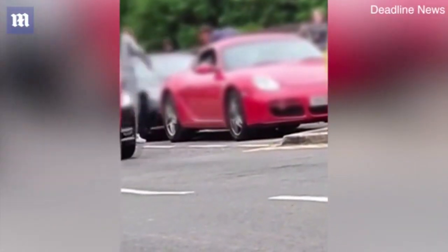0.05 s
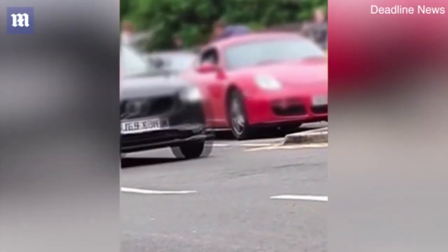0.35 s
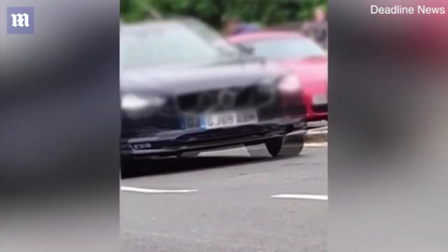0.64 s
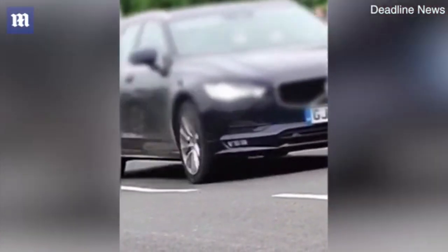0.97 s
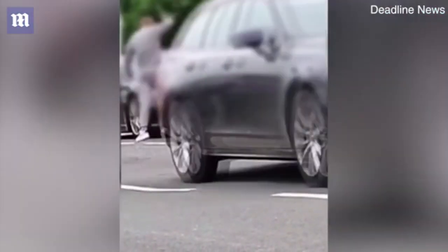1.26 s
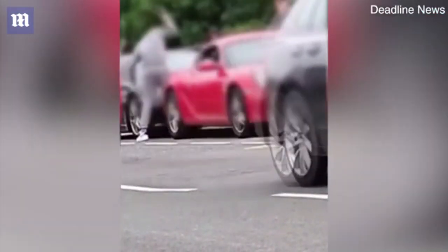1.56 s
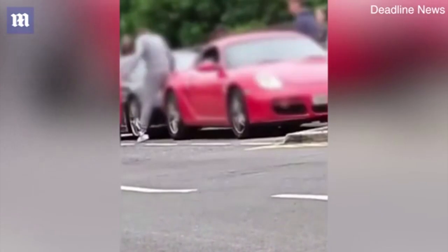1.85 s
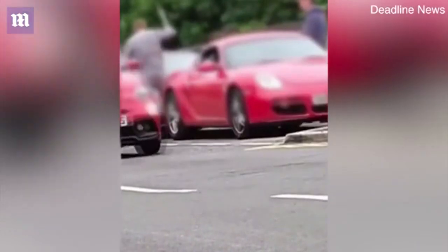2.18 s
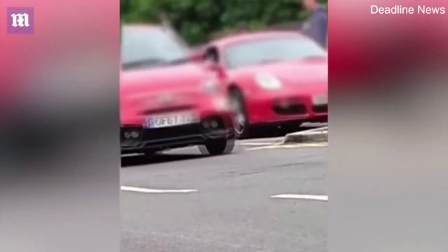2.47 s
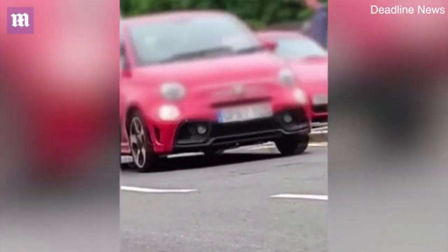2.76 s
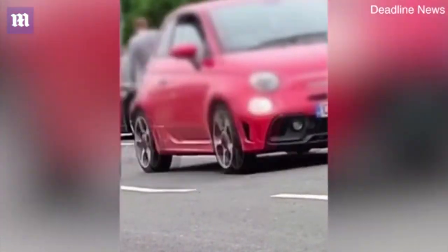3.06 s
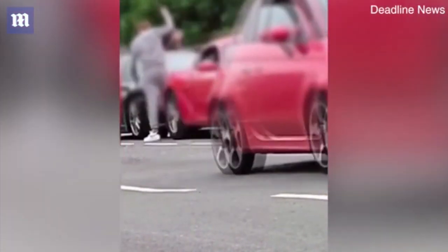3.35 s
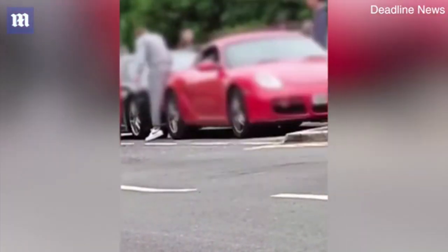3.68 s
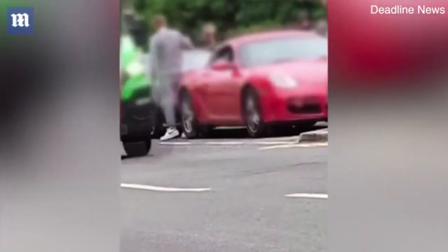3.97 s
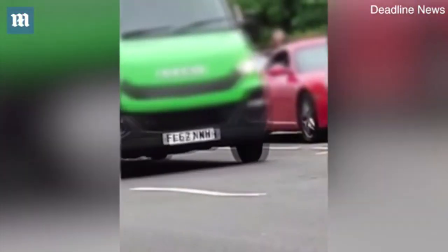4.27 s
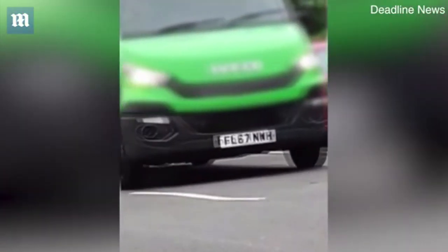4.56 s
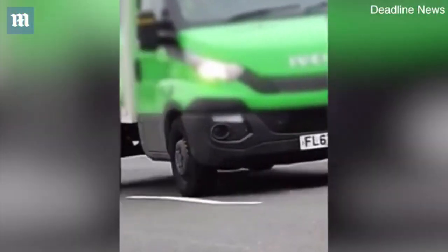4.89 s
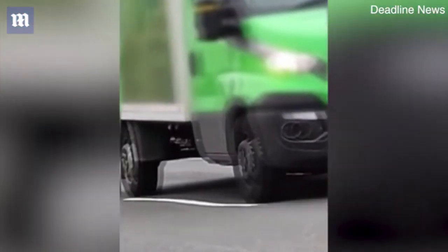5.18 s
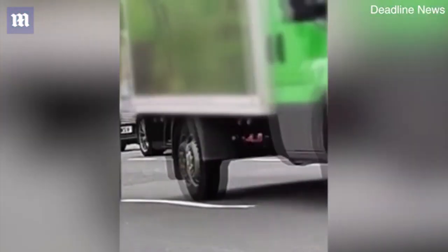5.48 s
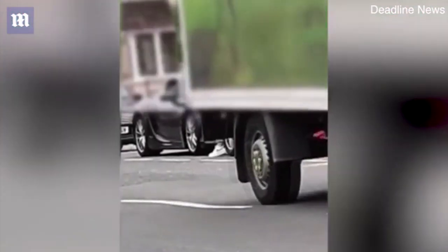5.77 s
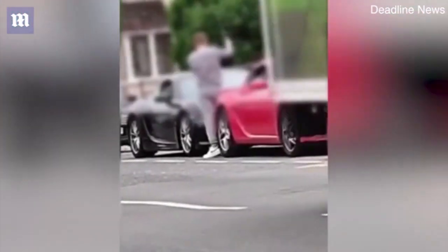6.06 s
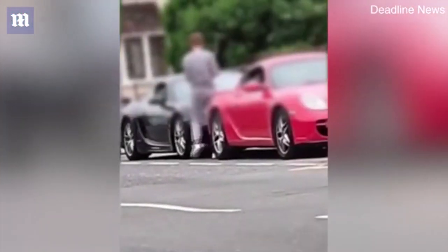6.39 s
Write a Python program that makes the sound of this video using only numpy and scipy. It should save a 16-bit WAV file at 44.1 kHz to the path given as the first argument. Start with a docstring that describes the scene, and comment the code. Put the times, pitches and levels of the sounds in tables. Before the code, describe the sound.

A steel wrench beats a car bonnet seven times, a little under a second apart. Each blow is a deep panel boom with a sheet metal crash, a brief clang, a faint rattle and a short echo. Heard from across a busy street, the blows stand above steady traffic and a low idling engine, while two cars and then a light lorry roll past.

```python
"""A steel wrench beats a car bonnet, seven blows, heard from across a busy street.
Each blow makes the panel boom; the wrench bites, bottoms out a moment later and the sheet steel crashes.
A metallic clang rings on, the loosened bonnet rattles, and the street throws back a short echo.
An engine idles nearby while two cars and a light lorry roll past, out of the steady traffic."""
import sys
import numpy as np
from scipy import signal
from scipy.fft import rfft, irfft, next_fast_len
from scipy.io import wavfile

SR = 44100
rng = np.random.default_rng(int(sys.argv[2]) if len(sys.argv) > 2 else 0)


def bounce(signal):
    """Save signal as a 16-bit WAV file at the path given by the first command-line argument."""
    frames = np.transpose(np.atleast_2d(signal))
    limited = np.clip(frames, -1, 1)
    pcm = np.round(limited * 32767).astype(np.int16)
    wavfile.write(sys.argv[1], SR, pcm)


N = 283607

# Wrench blows, the second landing twice: start_s, boom_db, off_centre (0-1), pitch_factor, bite_db,
# bottom_wait_s, bottom_db, bright_db_per_octave, ring_factor
BLOWS = [(0.2826, 1.5, 0.2, 0.95, -15.5, 0.0135, -16, -1.25, 1.15),
         (1.2132, -1.5, 0.45, 0.96, -22, 0.01, -18.5, 0.1, .9),
         (1.2308, 0.1, 1, 1.025, -17.5, 0.0153, -37, -1, 0.74),
         (2.0863, 2.5, 0.22, 1.01, -16.5, 0.015, -19, 0.6, .9),
         (3.0045, 1, 0.14, 1.04, -18, 0.013, -9.5, -0.1, 1.02),
         (3.9248, -1, 0.18, 1.01, -17, 0.0125, -10.8, 0, 0.84),
         (4.9637, -0.5, 0.1, 1.0, -27.5, 0.011, -12.5, -0.4, 1.02),
         (5.8437, 0.5, 0.04, 0.97, -24, 0.011, -16, 0.2, 0.86)]
# Where the impacts sit between the ears: frequency_hz, left_minus_right_db
IMPACT_BALANCE = [(150, -1), (400, -4), (1000, -1.5), (2000, 0), (3300, -0.5), (4800, 3), (5600, -1),
                  (6500, -13), (7200, -12), (8200, -8)]
# Stereo width of the street: frequency_hz, left_right_likeness (-1 to 1)
ROAD_LIKENESS = [(60, .95), (250, .88), (600, .84), (1200, .72), (2200, .62), (3000, .42), (4300, .33),
                 (5800, -.1), (8000, 0.05)]
# Where the street sits between the ears: frequency_hz, left_minus_right_db
ROAD_BALANCE = [(50, 0.5), (150, 0), (320, -2.5), (900, -3), (1500, 1), (2700, -0.5), (4700, 1.5),
                (5700, -1), (6700, -8), (7400, -7), (8200, -2)]


def bonnet_boom(scatter_db, detune):
    """The whole panel swings in its low modes; a blow off centre favours the higher ones."""
    # Panel modes: pitch_hz, level_db, t60_s, first_swing_sign, off_centre_change_db
    modes = [(52.7, -25.5, .15, 1, 2), (76.3, -22, .39, 1, -8), (108.5, -13, .18, -1, -6),
             (134, -28, .36, 1, 4), (173.4, -19, .17, -1, 6), (238, -25, .18, -1, 4)]
    out, t = np.zeros((2, N)), np.arange(SR) / SR
    chance = rng.standard_normal((len(BLOWS), len(modes), 2))
    for (start_s, level_db, off_centre, pitch, *_), luck in zip(BLOWS, chance):
        for (hz, mode_db, t60, direction, edge_db), (strength, shift) in zip(modes, luck):
            gain = from_db(level_db + mode_db + off_centre * edge_db + scatter_db * strength)
            swing = np.sin(2 * np.pi * hz * pitch * (1 + detune * shift) * t)
            add(out, start_s, direction * gain * swing * decay(t, t60))
    return out


def wrench_contacts():
    """Steel meets steel twice a blow: softer contacts are duller, harder ones choke the sheet's ring."""
    firm_db, firm_t60_s, longest_t60_s = -16, 0.097, 0.093
    dulling, choking = 0.97, 0.55   # per dB of force: dB per octave of tilt, dB of ring time
    contacts = []
    for start_s, _, _, _, bite_db, wait_s, bottom_db, blow_tilt_db, ring in BLOWS:
        for contact_s, level_db in ((start_s, bite_db), (start_s + wait_s, bottom_db)):
            force_db = level_db - firm_db
            tilt_db = blow_tilt_db + np.clip(dulling * force_db, -6, 0)
            t60 = min(ring * firm_t60_s * from_db(-choking * force_db), longest_t60_s)
            contacts.append((contact_s, level_db, tilt_db, t60))
    return contacts


def sheet_noise(size, tilt_db):
    """The countless close modes of sheet steel blur into a wash of noise."""
    # Colour of the sheet: frequency_hz, level_db
    colour = [(120, -11), (260, -0.5), (550, 2), (900, 1.5), (1400, 1), (2200, 0), (2800, -5.5), (3700, -8),
              (4800, -8.5), (5800, -9), (6700, -5.5), (7500, -12.5), (8150, -20), (8400, -44)]
    # Stereo width of the sheet: frequency_hz, left_right_likeness (-1 to 1)
    likeness = [(200, .95), (1000, .92), (3200, .86), (4300, .1), (5500, -.55), (6500, -.15), (7400, .3),
                (8200, .1)]
    return stereo_noise(colour, likeness, IMPACT_BALANCE, size, tilt_db)


def sheet_crash(spread_s, split_hz, low_linger):
    """Each contact spreads over the sheet and wakes its dense modes; the lower ones linger."""
    out, t = np.zeros((2, N)), np.arange(SR // 2) / SR
    lowpass = signal.butter(2, split_hz, fs=SR, output="sos")
    attack = 1 - np.exp(-t / spread_s)
    for start_s, level_db, tilt_db, t60 in wrench_contacts():
        sheet = sheet_noise(len(t), tilt_db)
        low = signal.sosfiltfilt(lowpass, sheet)
        burst = low * decay(t, t60 * low_linger) + (sheet - low) * decay(t, t60)
        add(out, start_s, from_db(level_db) * burst * attack)
    return out


def metallic_clang(level_db, scatter_db):
    """A cluster of decaying tones rings on, in a different blend at each contact."""
    # Ringing tones of the metallic clang at each contact: pitch_hz, level_db, t60_s
    tones = [(375, -35, .16), (470, -33, .16), (540, -33, .18), (740, -37, .16), (880, -31, .25),
             (1035, -32, .16), (1150, -34, .18), (1290, -32, .16), (1570, -32, .14), (1820, -31, .12),
             (2080, -33, .12), (2315, -30, .16), (2500, -41, .35), (2785, -35.5, .2), (3235, -38, .22),
             (3480, -38, .14), (3740, -38, .14), (4700, -39, .12), (6500, -39, .1), (6930, -35, .14),
             (7310, -40, .1)]
    hz, tone_db, t60 = np.transpose(tones)
    out, t = np.zeros((2, N)), np.arange(SR // 2) / SR
    contacts = wrench_contacts()
    chance = rng.standard_normal((len(contacts), 3, len(tones)))
    ears = panned(0.92, at_hz(IMPACT_BALANCE, hz))
    for (start_s, contact_db, tilt_db, _), (strength, shift, direction) in zip(contacts, chance):
        colour_db = tone_db + tilt_db * np.log2(hz / 1500) + scatter_db * strength
        gain = np.sign(direction) * from_db(level_db + contact_db + colour_db)
        detuned_hz = hz * (1 + 0.0049 * shift)
        rings = np.sin(2 * np.pi * np.outer(detuned_hz, t)) * decay(t, t60[:, None])
        add(out, start_s, (ears * gain) @ rings)
    return out


def paint_crack(level_db, t60, tilt_db):
    """Paint and skin give way in a few bright milliseconds at each contact."""
    out, t = np.zeros((2, N)), np.arange(SR // 10) / SR
    for start_s, contact_db, contact_tilt_db, _ in wrench_contacts():
        snap = sheet_noise(len(t), tilt_db + contact_tilt_db) * decay(t, t60)
        add(out, start_s, from_db(contact_db + level_db) * snap)
    return out


def bonnet_rattle(level_db, first_s, last_s, fade_db, t60, count):
    """The bonnet chatters against its catch and trim, louder as every blow loosens it."""
    loosening_db = 1.23
    out, t = np.zeros((2, N)), np.arange(SR // 4) / SR
    tick = sheet_noise(len(t), tilt_db=-1) * decay(t, t60)
    for blows_before, (start_s, *_) in enumerate(BLOWS):
        for progress in (np.arange(count) + rng.random(count)) / count:
            tick_s = start_s + first_s + progress * (last_s - first_s)
            tick_db = level_db + loosening_db * blows_before + fade_db * progress
            add(out, tick_s, from_db(tick_db) * tick)
    return out


def street_echo(sound, level_db, t60, build_s, treble_db):
    """Parked cars and house fronts scatter a short, dull tail."""
    t = np.arange(SR) / SR
    colour = [(50, 0.015), (1000, 0.03), (8000, treble_db)]   # frequency_hz, level_db
    walls = stereo_noise(colour, ROAD_LIKENESS, ROAD_BALANCE, len(t))
    tail = walls * decay(t, t60) * (1 - np.exp(-(t / build_s) ** 2))
    tail /= np.sqrt(np.mean(np.sum(tail ** 2, axis=1)))
    return from_db(level_db) * signal.fftconvolve(sound, tail, axes=1)[:, :N]


def traffic():
    """Bodies rumble, tyres roar and whoosh, and treads hiss as each vehicle comes by."""
    # Colours of body rumble, car and lorry tyre roar, tyre whoosh and tread hiss: frequency_hz, level_db
    rumble_colour = [(20, -15), (35, -8.5), (52, 8.5), (80, 0.5), (115, -1), (165, -6.5), (230, -7),
                     (340, -13.5), (550, -33)]
    car_colour = [(200, -4.5), (350, -3), (520, 0), (660, 0.5), (930, 0), (1200, -4.5), (1500, -7.5),
                  (2000, -20.5)]
    lorry_colour = [(200, -4.5), (350, 1), (530, 0.5), (700, -2.5), (950, -1), (1200, -2), (1500, -9.5),
                    (2000, -34)]
    whoosh_colour = [(1000, -15), (1400, -2.5), (1650, 0.5), (2000, -1), (2450, -3), (2850, -14),
                     (3600, -30.5)]
    hiss_colour = [(1900, -3), (2850, 2), (3500, 0.5), (4500, 2), (5600, 2), (6400, 5), (7000, 2),
                   (7700, 0), (8400, -23.5)]
    # Crossfade from the cars' roar to the lorry's: start_s, end_s
    crossfade = (3.32, 4.35)
    lorry_share = np.interp(np.arange(N) / SR, crossfade, (0, 1))
    rumble_db, roar_db, whoosh_db, hiss_db = pass_by_levels()
    rumble = road_noise(rumble_colour, rumble_db + 1.5, flutter_db=1.24, reflected=0)
    cars = road_noise(car_colour, roar_db + 0.41, flutter_db=0, reflected=0.21)
    lorry = road_noise(lorry_colour, roar_db + 1.9, flutter_db=0, reflected=0.21)
    roar = np.sqrt(1 - lorry_share) * cars + np.sqrt(lorry_share) * lorry
    whoosh = road_noise(whoosh_colour, whoosh_db - 0.45, flutter_db=-0.4, reflected=0.42)
    hiss = road_noise(hiss_colour, hiss_db + 2.5, flutter_db=1.52, reflected=0.42)
    return rumble + roar + whoosh + hiss


def pass_by_levels():
    """Four level curves in dB: each vehicle nears and leaves on a straight line, over the far street."""
    # A quiet saloon, a small car and the lorry: nearest_s, fade_s, rumble_db, roar_db, whoosh_db, hiss_db
    passes = [(0.8, 0.76, -45, -55, -63, -56), (2.86, 0.69, -44, -35, -39, -40),
              (5.64, 2.3, -37, -37.5, -43.8, -44)]
    # The steady bed of distant traffic: rumble_db, roar_db, whoosh_db, hiss_db
    far_traffic = (-41.5, -53, -57, -53)
    # Tyres throw their treble backwards, so it peaks later: rumble_s, roar_s, whoosh_s, hiss_s
    lags = (0.0059, 0, .04, 0.044)
    t = np.arange(N) / SR - np.array(lags)[:, None]
    power = from_db(far_traffic)[:, None] ** 2
    for nearest_s, fade_s, *levels_db in passes:
        distance = np.hypot(1, (t - nearest_s) / fade_s)   # in units of the closest approach
        amplitude = from_db(levels_db)[:, None] / distance ** 1.48
        power = power + amplitude ** 2
    return 10 * np.log10(power)


def road_noise(colour, level_db, flutter_db, reflected):
    """One layer of the traffic noise; flutter_db sets how much uneven asphalt shakes its level."""
    direct = stereo_noise(colour, ROAD_LIKENESS, ROAD_BALANCE, N)
    rippled = car_reflections(direct, reflected, delay_s=0.0035, sway_s=0.0006, count=3)
    return from_db(level_db + flutter_db * drift(8.8)) * rippled


def car_reflections(sound, share, delay_s, sway_s, count):
    """Paths off moving car bodies keep changing and sweep ripples through the noise."""
    samples, out = np.arange(N), sound.copy()
    for k in range(count):
        lag = SR * ((k + 1) * delay_s + sway_s * drift(0.88))
        delayed = np.array([np.interp(samples - lag, samples, ear) for ear in sound])
        out += share * (-1) ** k * delayed
    return rms_one(out)


def passing_engines():
    """Three exhausts swell and fade; the lorry's pipe booms as its revs sink through the resonance."""
    # Rev curves: time_s, firing_hz
    car_revs = [(2.3, 55.3), (3.15, 56.1), (3.9, 42.7)]   # holds, then eases off
    saloon_revs = [(0, 53.4), (1.6, 52)]   # coasts
    lorry_revs = [(3.7, 83), (4.4, 84.05), (4.95, 59.4), (5.23, 46.35), (5.6, 53), (6.43, 57.5)]   # sinks for a gear change, then picks up
    # Engine envelopes: start_s, attack_s, hold_s, release_s, level_db
    car_swell = (1.9, 0.46, .62, 0.7, -31.5)
    saloon_swell = (-0.6, 0.9, 1, 1, -43)
    lorry_swell = (3, 0.64, 2, 3, -44)
    car = exhaust(car_revs, car_swell, pipe_db=-0.5, wobble=0.0046, uneven_db=4)
    saloon = exhaust(saloon_revs, saloon_swell, pipe_db=3.5, wobble=0.01, uneven_db=2.5)
    lorry = exhaust(lorry_revs, lorry_swell, pipe_db=12.5, wobble=0.02075, uneven_db=4)
    return car + saloon + lorry


def exhaust(revs, envelope, pipe_db, wobble, uneven_db):
    """The firing rate and its harmonics swell unevenly, shifted by pipe_db at the pipe's resonance."""
    # Harmonics of the exhaust note: multiple, level_db
    harmonics = [(1, -3), (2, -16), (3, -16), (4, -22.5)]
    pipe_hz, half_width_hz = 46.5, 5.4
    firing_hz, = curves(revs)
    level_db = swell(*envelope) + pipe_db / np.hypot(1, (firing_hz - pipe_hz) / half_width_hz)
    phase = shaft_phase(firing_hz, wobble)
    return np.sqrt(2) * sum(from_db(level_db + harmonic_db + uneven_db * drift(4.5)) * np.sin(k * phase)
                            for k, harmonic_db in harmonics)


def driveline_whine():
    """The lorry's driveline whines as it draws level."""
    # A slowly falling tone: time_s, pitch_hz, level_db
    whine = [(5.5, 337.7, -67.5), (5.9, 331.2, -38.5), (6.15, 327, -39), (6.43, 322, -53)]
    return machine_hum(*curves(whine), wobble=0.015, uneven_db=3)


def machine_hum(hz, level_db, wobble, uneven_db):
    """A single machine tone, wavering in pitch and level."""
    return np.sqrt(2) * from_db(level_db + uneven_db * drift(5)) * np.sin(shaft_phase(hz, wobble))


def shaft_phase(hz, wobble):
    """Phase of a shaft whose speed wavers."""
    return 2 * np.pi * np.cumsum(hz * (1 + wobble * drift(5.26))) / SR


def swell(start_s, attack_s, hold_s, release_s, level_db, depth_db=17):
    """Level in dB that climbs depth_db over the attack, holds, then falls depth_db every release_s."""
    t = np.arange(N) / SR - start_s - attack_s
    return level_db + depth_db * np.minimum(0, np.minimum(t / attack_s, (hold_s - t) / release_s))


def stereo_noise(colour, likeness, balance, size, tilt_db=0):
    """Noise of rms 1 with a colour, width and balance at each frequency, tilted by tilt_db per octave."""
    padded = next_fast_len(size, True)
    hz = np.fft.rfftfreq(padded, 1 / SR)
    mid, side = rfft(rng.standard_normal((2, padded)))
    alike, ears = np.clip(at_hz(likeness, hz), -1, 1), np.array([[1], [-1]])
    white = np.sqrt(1 + alike) * mid + np.sqrt(1 - alike) * side * ears
    in_band_hz = np.clip(hz, colour[0][0], colour[-1][0])
    skirts = (np.minimum(hz, in_band_hz) / np.maximum(hz, in_band_hz)) ** 2   # rolls off past both ends
    gain_db = at_hz(colour, hz) + tilt_db * np.log2(in_band_hz) + ears * at_hz(balance, hz) / 2
    return rms_one(irfft(skirts * from_db(gain_db) * white, padded)[:, :size])


def drift(rate_hz):
    """Slow random wander of rms 1."""
    hz = np.fft.rfftfreq(N, 1 / SR)
    return rms_one(irfft(rfft(rng.standard_normal(N)) / (1 + (hz / rate_hz) ** 2), N))


def curves(rows):
    """Columns of a breakpoint table at every sample."""
    time_s, *columns = np.transpose(rows)
    return [np.interp(np.arange(N) / SR, time_s, column) for column in columns]


def at_hz(points, hz):
    """Reads a curve on a log-frequency axis."""
    known_hz, values = np.transpose(points)
    return np.interp(np.log(hz + 1), np.log(known_hz + 1), values)


def add(out, start_s, sound):
    start = round(start_s * SR)
    out[:, start:start + sound.shape[-1]] += sound[..., :N - start]


def decay(t, t60):
    return np.exp(-np.log(1000) * t / t60)


def panned(sound, left_db):
    return sound * from_db(np.array([[1], [-1]]) * left_db / 2)


def from_db(db):
    return 10 ** (np.asarray(db) / 20)


def rms_one(sound):
    return sound / np.sqrt(np.mean(sound ** 2) + 1e-20)


def scene():
    """The blows and their street echo over the traffic."""
    boom = panned(bonnet_boom(scatter_db=3, detune=0.0026), left_db=-2)
    impacts = sheet_crash(spread_s=0.0009, split_hz=500, low_linger=1.6)
    impacts += metallic_clang(level_db=10, scatter_db=3.5)
    impacts += paint_crack(level_db=-9, t60=0.032, tilt_db=4.5)
    rattle = bonnet_rattle(level_db=-38.5, first_s=0.047, last_s=0.14, fade_db=-4, t60=0.058, count=5)
    echo = street_echo(boom, level_db=-14.5, t60=0.34, build_s=0.033, treble_db=-7.5)
    echo += street_echo(impacts, level_db=-14, t60=0.59, build_s=0.0088, treble_db=-2)
    engines = passing_engines()
    idling_car = machine_hum(hz=26.8, level_db=-36.3, wobble=0.0054, uneven_db=1.5)
    whine = driveline_whine()
    return boom + impacts + rattle + echo + traffic() + engines + idling_car + whine


def record(dry):
    """The tallest peaks are rounded off, then the top is cut steeply."""
    ceiling, cutoff_hz = 0.8, 8500
    rounded = dry / (1 + (dry / ceiling) ** 4) ** 0.25
    return signal.sosfilt(signal.ellip(12, 0.1, 75, cutoff_hz, fs=SR, output="sos"), rounded)


dry = scene()
out = record(dry)
bounce(out)
```